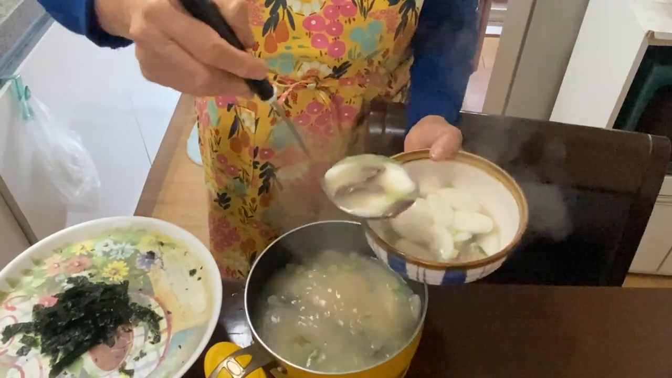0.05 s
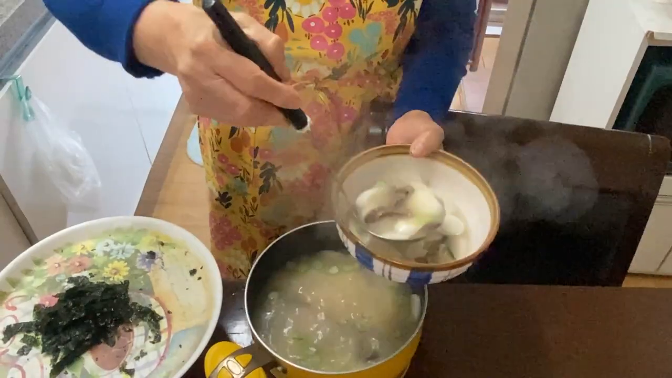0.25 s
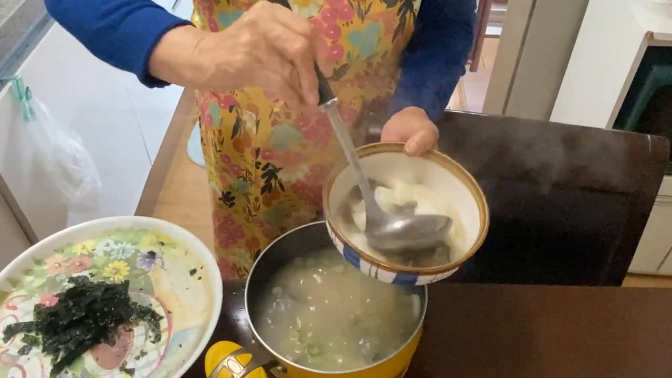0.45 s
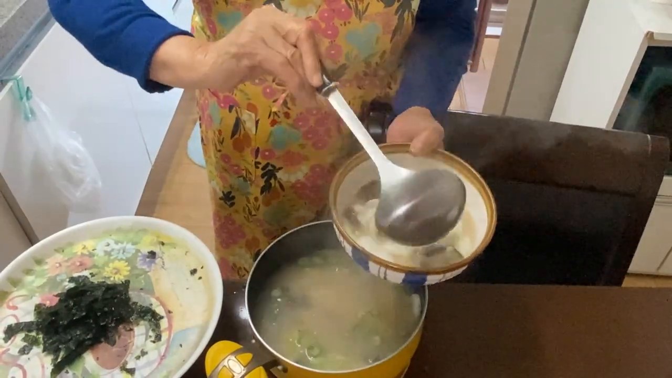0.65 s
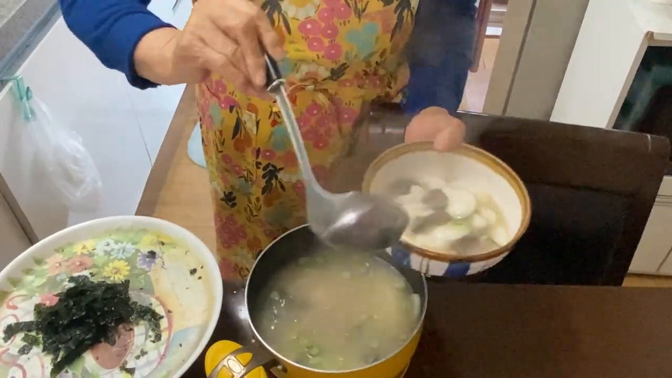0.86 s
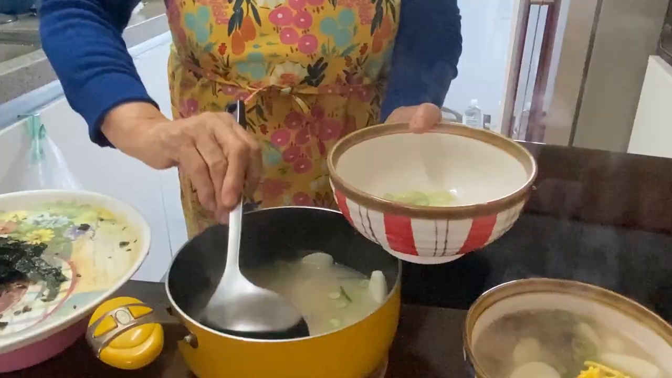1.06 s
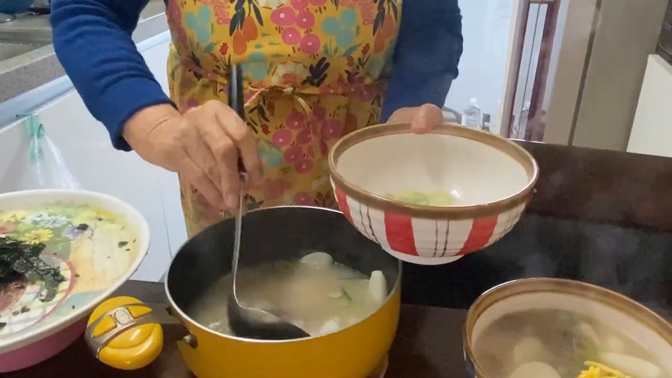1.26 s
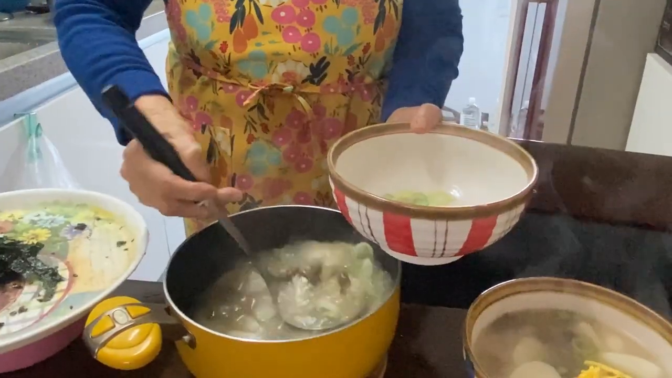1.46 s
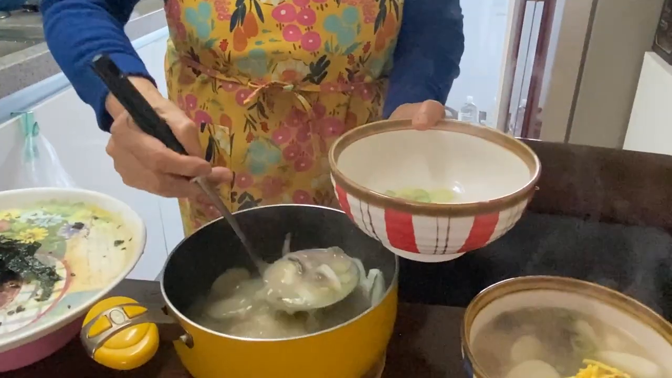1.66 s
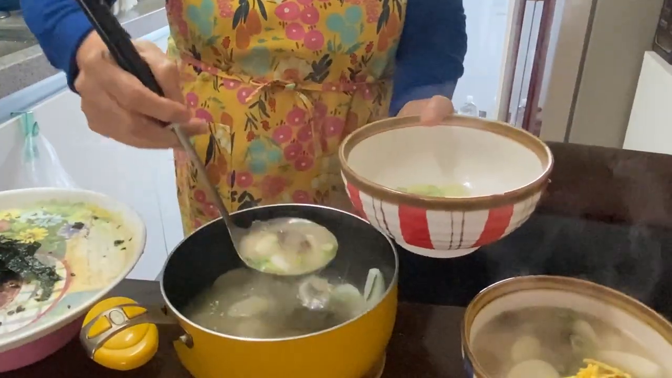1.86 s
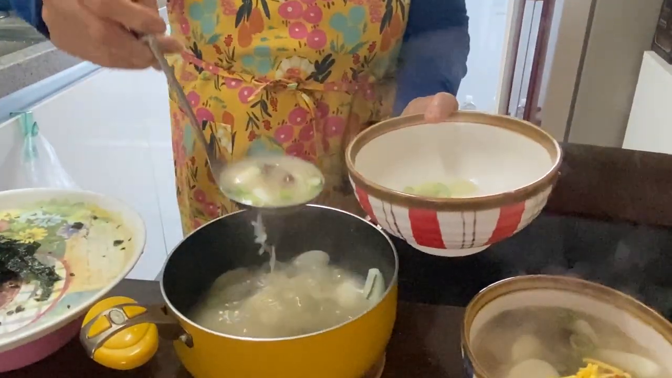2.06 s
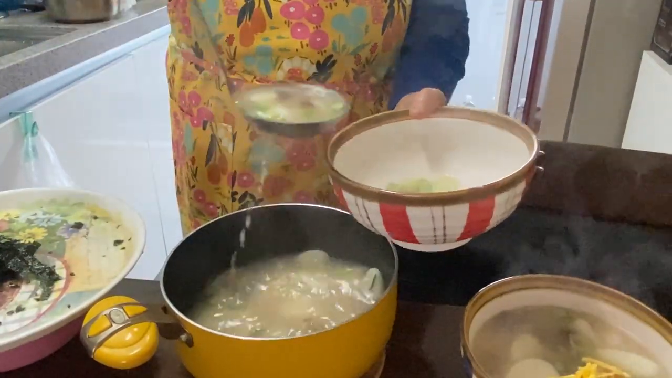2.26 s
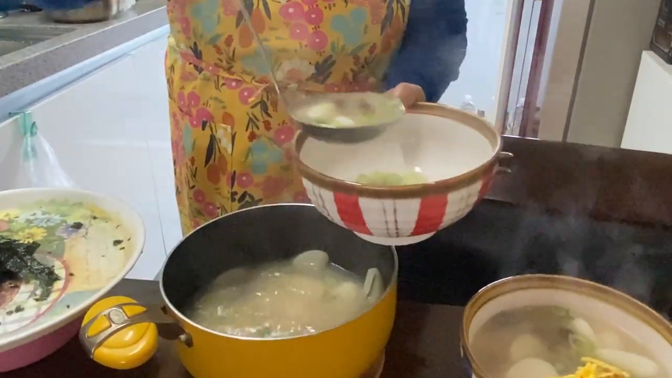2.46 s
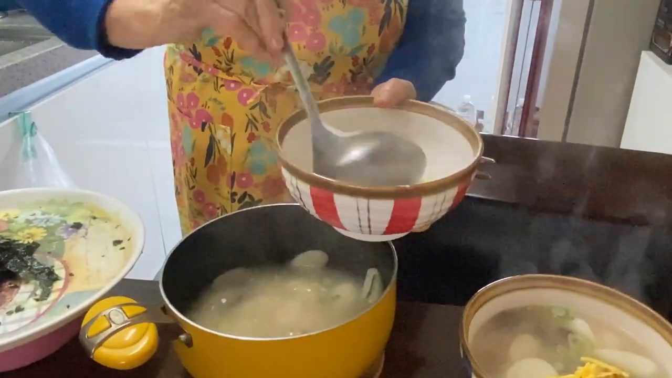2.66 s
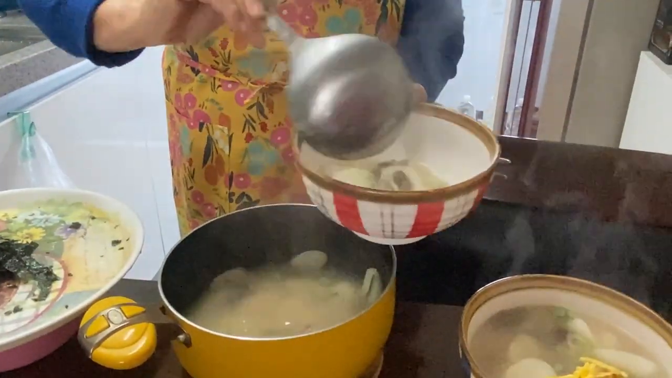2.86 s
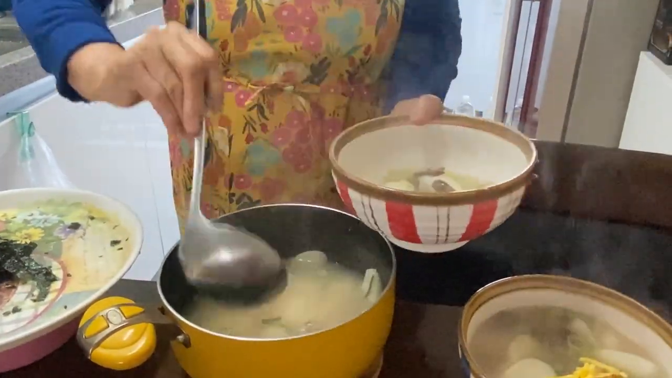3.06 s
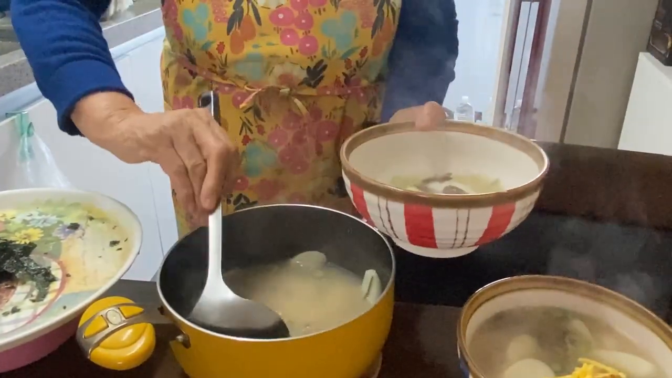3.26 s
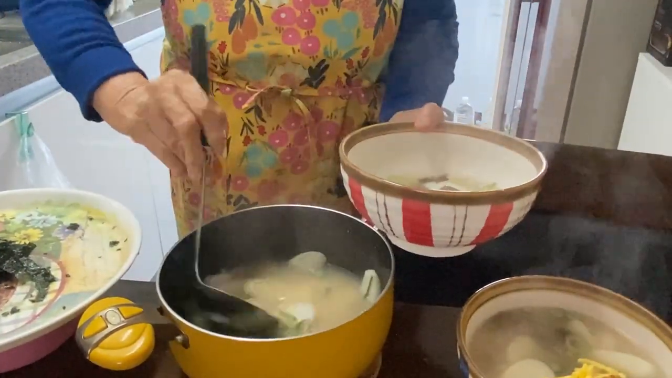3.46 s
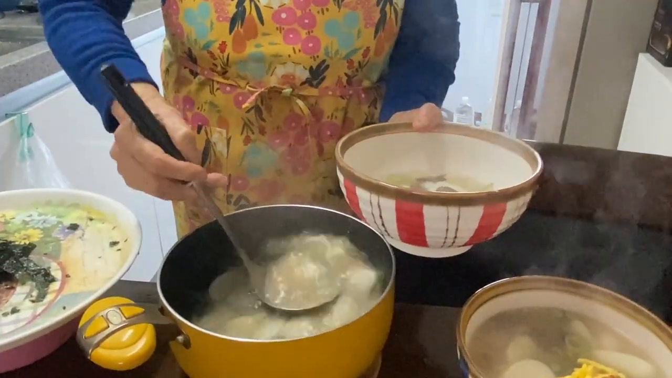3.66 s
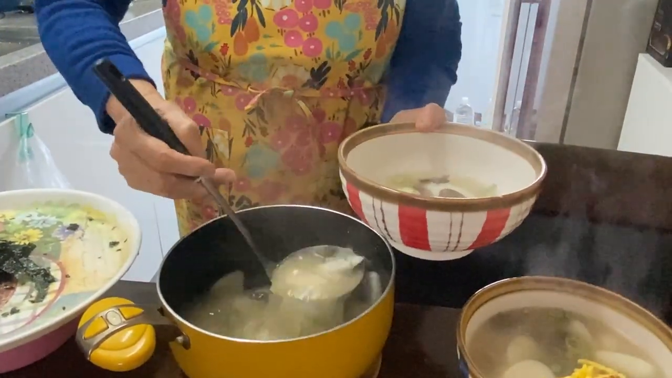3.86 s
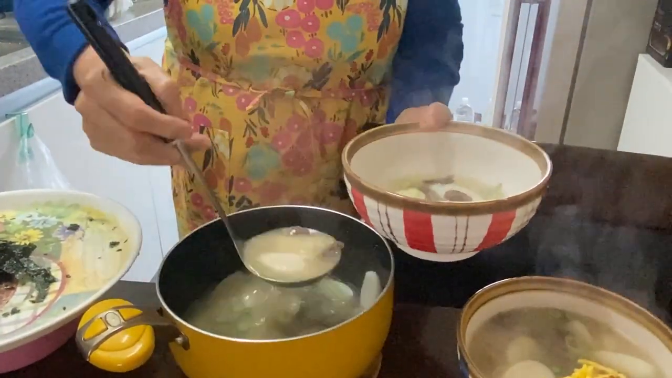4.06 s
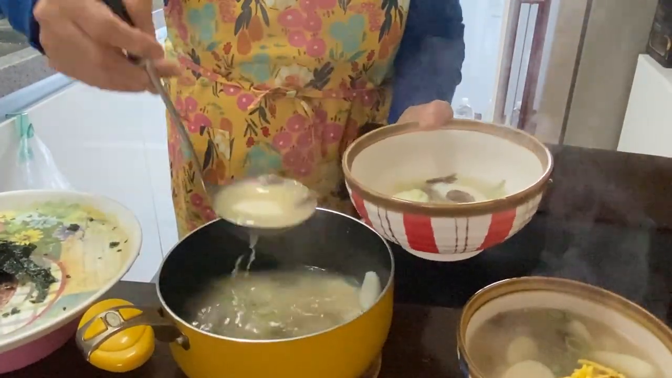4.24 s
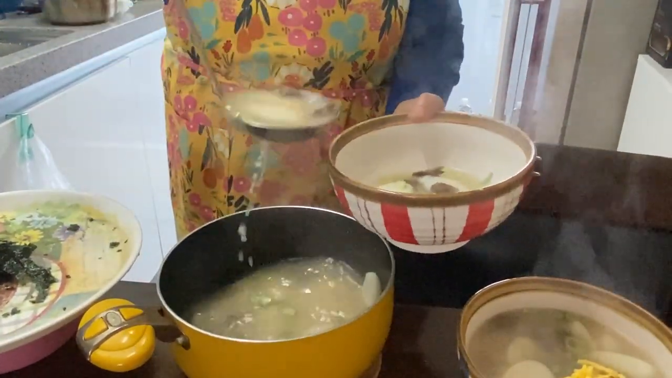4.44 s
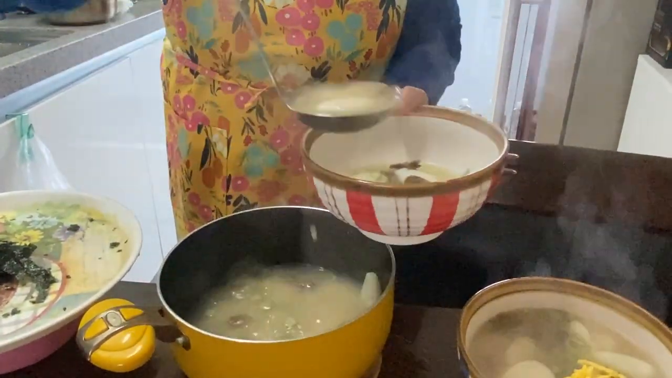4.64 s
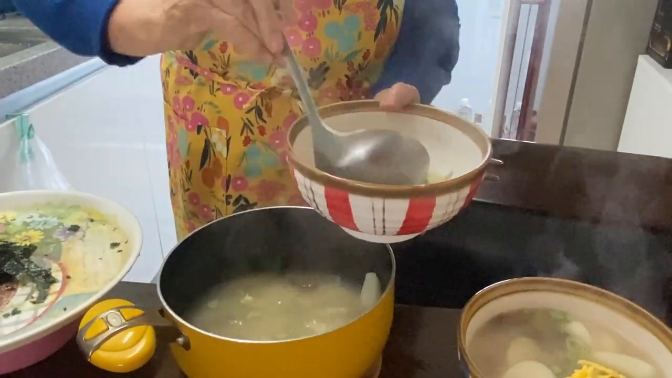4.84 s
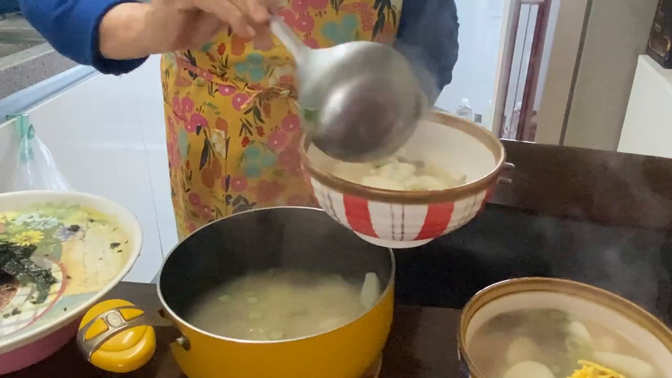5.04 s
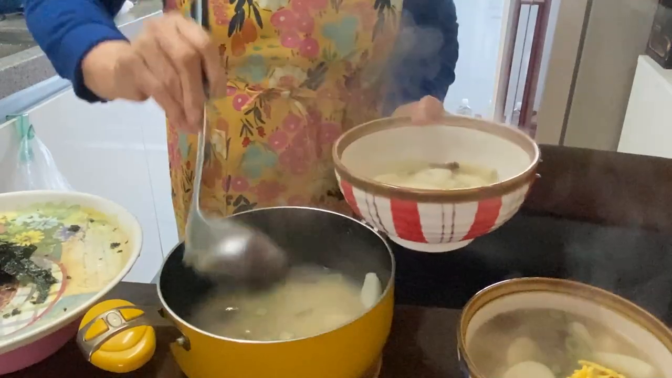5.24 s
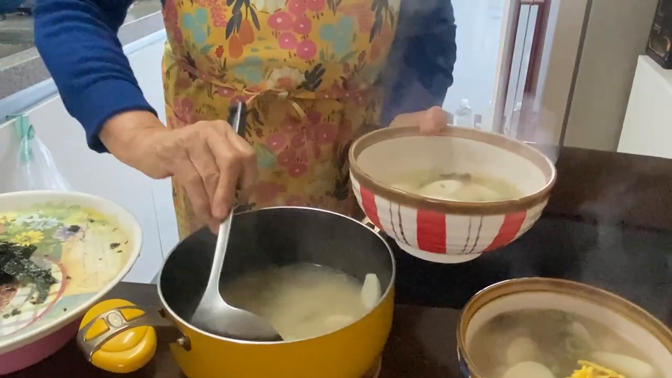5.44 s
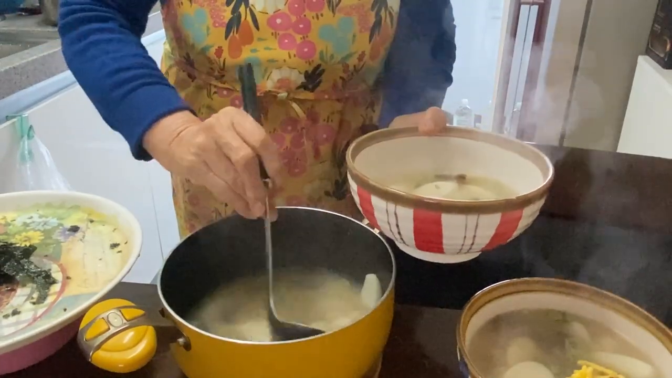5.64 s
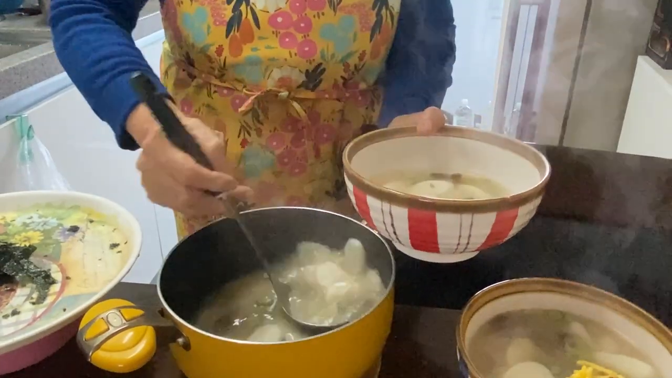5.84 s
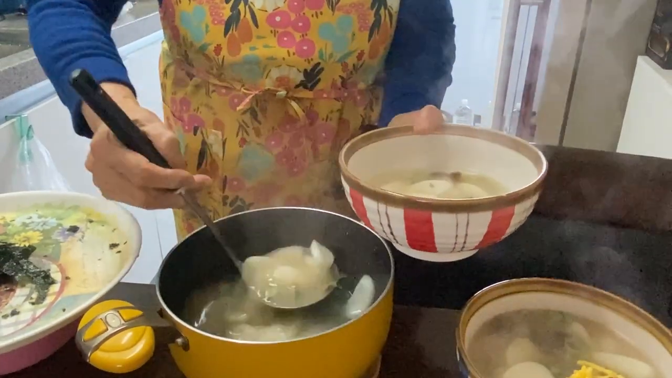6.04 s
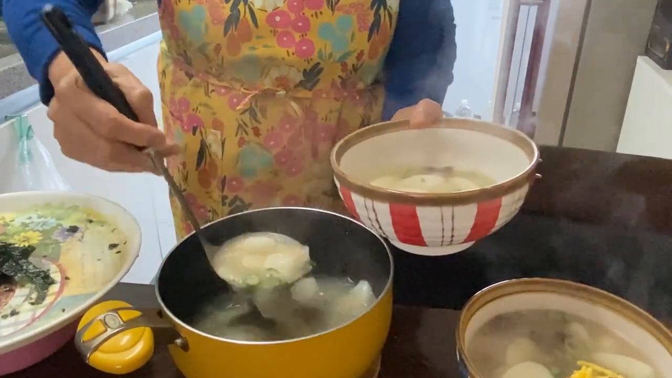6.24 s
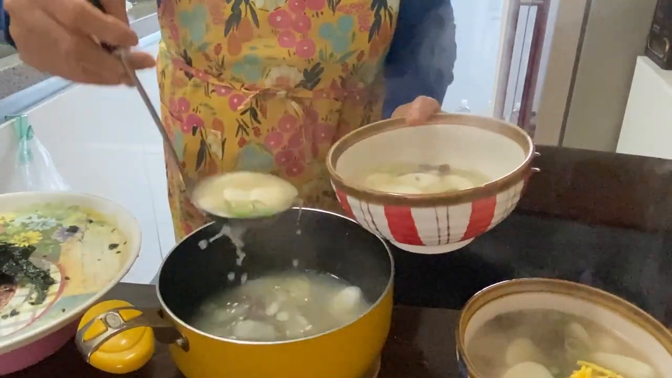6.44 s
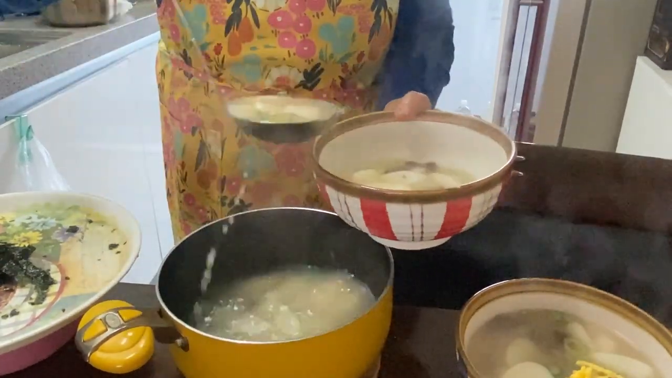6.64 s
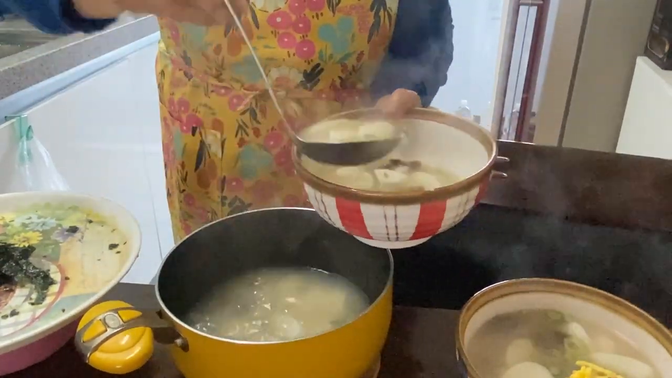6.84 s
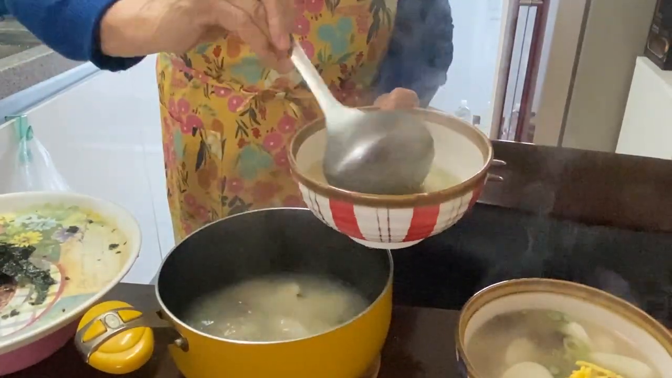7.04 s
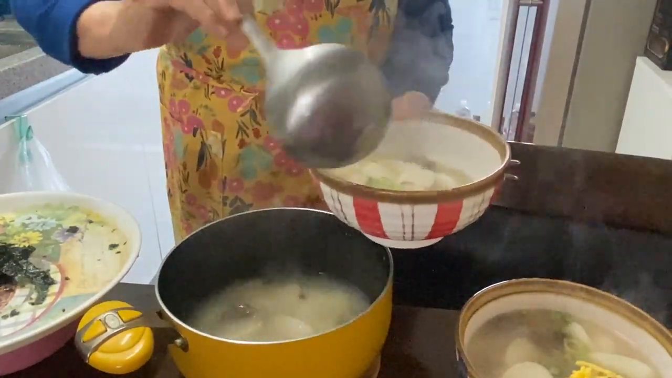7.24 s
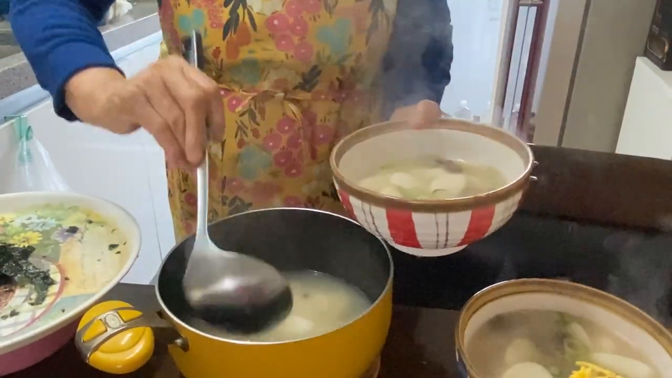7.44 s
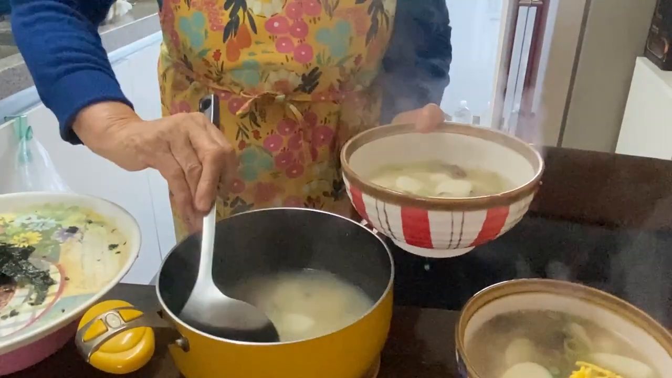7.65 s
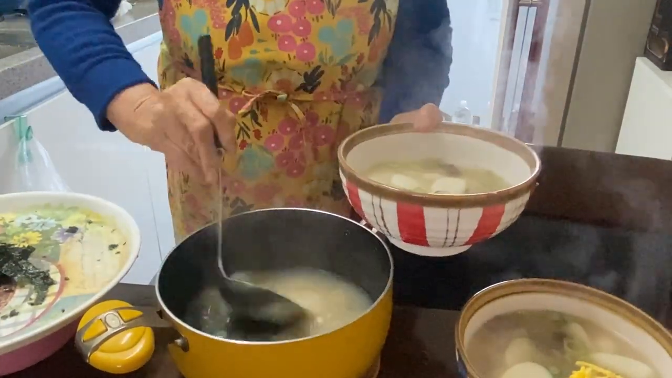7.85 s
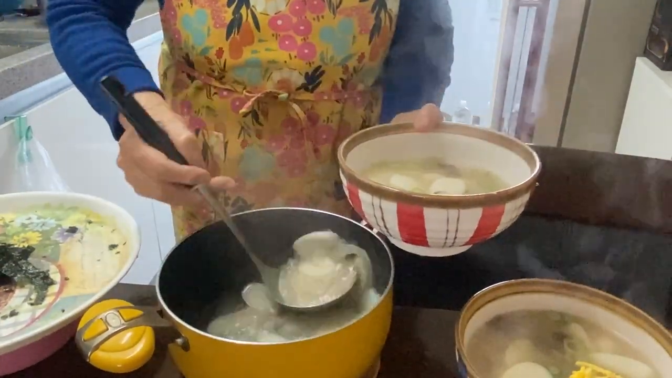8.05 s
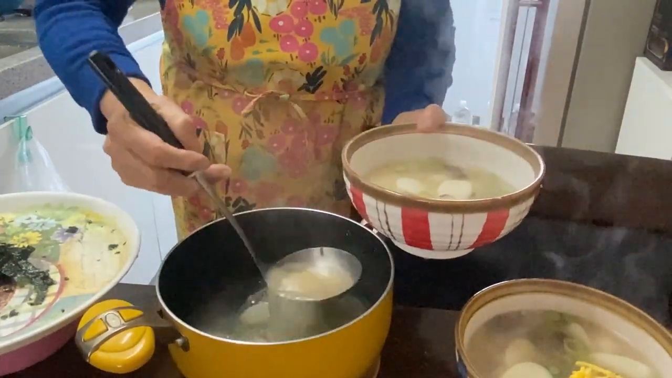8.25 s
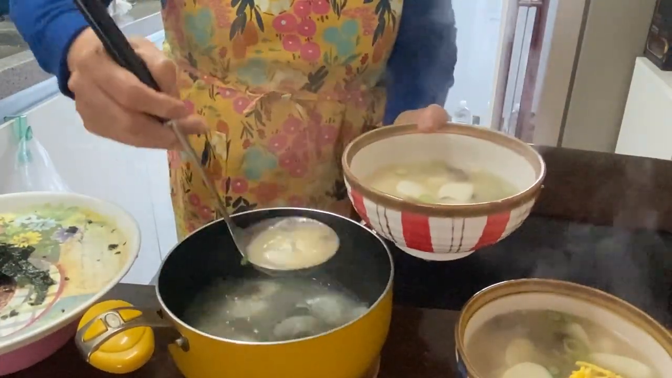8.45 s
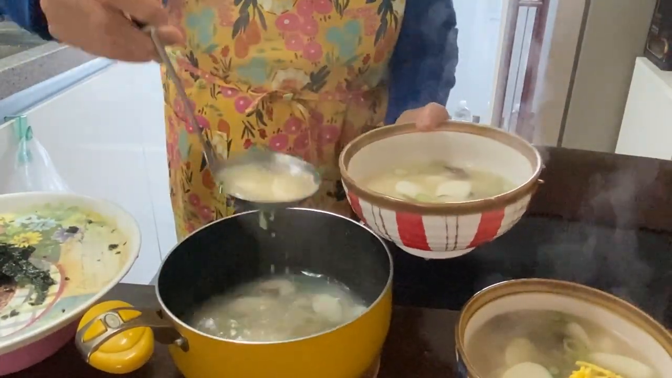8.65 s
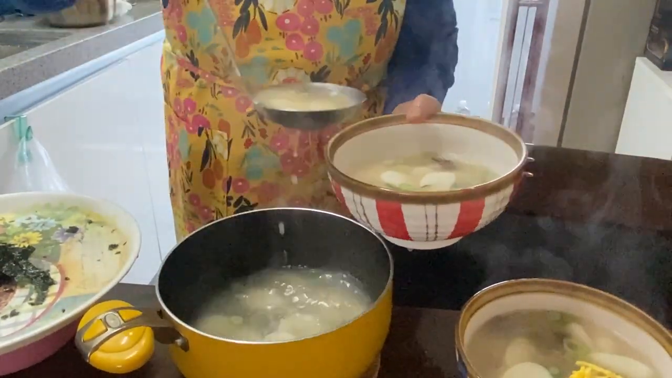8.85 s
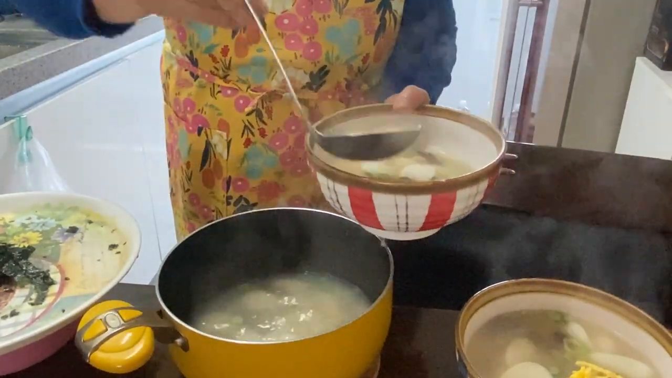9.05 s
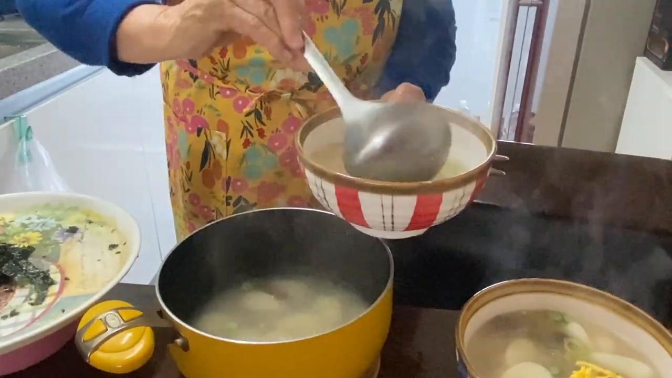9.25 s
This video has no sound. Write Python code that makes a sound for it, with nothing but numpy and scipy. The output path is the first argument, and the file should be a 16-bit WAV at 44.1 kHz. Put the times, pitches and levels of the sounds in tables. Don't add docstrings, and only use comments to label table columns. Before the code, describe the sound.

A metal ladle clanks and scrapes inside a soup pot four times, with sloshing, bright drips and small bubbling pours between dips in a kitchen.

```python
import sys
import numpy as np
from scipy import signal
from scipy.fft import rfft, irfft
from scipy.io import wavfile
from scipy.ndimage import uniform_filter1d

SR = 44100
rng = np.random.default_rng(int(sys.argv[2]) if len(sys.argv) > 2 else 0)


def inscribe(sig):
    pcm = np.round(np.clip(np.atleast_2d(sig).T, -1, 1) * 32767)
    wavfile.write(sys.argv[1], SR, pcm.astype(np.int16))


def attenuation_scalar(level_db):
    decades = np.asarray(level_db, float) / 20
    return 10 ** decades


N = 410130


def evened(x):
    return x / np.sqrt(np.mean(x ** 2) + 1e-20)


def read(points, hz):
    f, value = np.transpose(points)
    return np.interp(np.log(hz + 1), np.log(f + 1), value)


def coloured(x, points):
    gain = attenuation_scalar(read(points, np.fft.rfftfreq(len(x), 1 / SR)))
    return evened(irfft(rfft(x) * gain, len(x)))


def add(mix, s, sound):
    part = mix[round(s * SR):][:len(sound)]
    part += sound[:len(part)]


def humps(t, peaks_s, dbs, rise, fall):
    late = t - np.asarray(peaks_s)[:, None]
    drop_db = np.where(late < 0, -late * rise, late * fall)
    return np.sqrt((attenuation_scalar(np.asarray(dbs)[:, None] - drop_db) ** 2).sum(0))


def slow_humps(*shape):
    t = np.linspace(0, N / SR, num=4000)
    return np.interp(np.arange(N) / SR, t, humps(t, *shape))


def uneven(spread_db, hold):
    jumps = np.minimum(rng.exponential(1, N // hold + 1), 4)
    return rng.standard_normal(N) * attenuation_scalar(spread_db * jumps).repeat(hold)[:N]


def ring(t, dip, damping):
    # hz, t60_s, struck_db in dips 1, 2, 3, 4 and under the soup
    pot = [(700, 0.15, -25, -28.5, -25, -41.5, -20.5), (816, 0.12, -46, -24.5, -23, -43, -43),
           (913, 0.12, -26.5, -40.5, -30.5, -44, -24), (1002, 0.056, -44, -41, -17.5, -30.5, -53),
           (1150, 0.0857, -22, -38.5, -23.5, -32.5, -35), (1234, 0.4, -30.5, -37, -29, -34.5, -55),
           (1324, 0.15, -25, -31, -33.5, -33, -50), (1416, 0.1, -39, -23.5, -23.5, -33, -23),
           (1520, 0.11, -28, -38.5, -37, -49, -57), (2110, 0.25, -39.5, -37.5, -33, -55, -40),
           (2320, 0.12, -59, -33.5, -25, -30, -45), (2465, 0.22, -37, -30.5, -47, -46.5, -54),
           (2530, 0.14, -28, -49.5, -46.5, -55, -57), (2545, .35, -53, -45, -44, -54, -33),
           (2700, 0.12, -38, -29, -32, -36, -30), (2850, .14, -38, -46, -32, -51, -27),
           (3068, 0.14, -46, -29, -48, -34, -25.5)]
    # t60_s, struck_db in dips 1, 2, 3, 4 and under the soup
    ladle = [(0.093, -24.5, -16, -23, -31, -50), (0.085, -53, -34.5, -30, -39, -26),
             (0.29, -53, -17.5, -27, -30, -48), (.15, -31.5, -43.5, -58, -46, -50),
             (0.14, -42, -25, -42, -53.5, -55), (0.23, -41, -28.5, -35.5, -50.5, -44),
             (0.2, -37, -33, -31, -39.5, -57), (0.15, -36, -51, -47, -43, -54),
             (0.13, -62, -23.5, -50, -41, -58), (0.26, -44, -25, -42.5, -39, -44),
             (0.23, -47, -24.5, -38, -56, -55), (0.2, -50, -26.5, -37, -55.5, -56),
             (0.13, -36.5, -36.5, -37, -53.5, -51), (0.09, -39, -23, -21, -33, -33),
             (0.19, -69, -42.5, -60.5, -67.5, -67), (0.2, -68, -37.5, -58, -61.5, -48)]
    ladle_hz = [3190, 3530, 3684, 3742, 3835, 4095, 4582, 4645, 4960, 5530, 5612, 6597, 6920, 7605, 9400,
                10734]
    beat_depth, beat_low_hz, beat_top_hz = 0.7, 25, 90
    modes = pot + [(hz, *row) for hz, row in zip(ladle_hz, ladle)]
    hz, t60_s, *struck_db = np.transpose(modes)[:, :, None]
    fall_db = 60 * t / (t60_s * damping)
    level = attenuation_scalar(struck_db[dip]) * (attenuation_scalar(-1.3 * fall_db) + attenuation_scalar(-19 - 0.22 * fall_db))
    chance = rng.random(hz.shape)
    beat_hz = beat_low_hz + (beat_top_hz - beat_low_hz) * chance
    beat = 1 + beat_depth * np.sin(2 * np.pi * beat_hz * t)
    return (level * beat * np.sin(2 * np.pi * (hz * t + chance))).sum(0)


def clinks():
    # start_s, crack_peak_db, ring_db (re first blow of the dip), damping (factor on decay)
    blows = [(1.056, -23.5, -0.6, 0.42), (1.1288, -16.5, -36, 0.52), (3.195, -7.5, 0.5, 0.29),
             (3.229, -13, -23, 0.37), (5.3906, -9.5, 0.5, 0.41), (5.446, -28, -18.5, 0.3),
             (7.515, -15.5, 1.5, 0.41), (7.554, -27, -7, 0.29), (7.581, -26, -12, 0.36),
             (7.676, -53, -30, 0.72), (7.907, -26.5, -32, 0.55), (7.9248, -14.5, -3.5, 0.25)]
    dips = [
        2,
        4,
        6,
        7.85,
    ]
    # hz, db_per_hz
    crack_tone = [(120, -68.5), (200, -56), (500, -27.5), (735, -2.5), (1870, -9.5), (3760, -8),
                  (5630, -10.5), (7830, -14.5), (16000, -44)]
    out, t = np.zeros(N), np.arange(SR // 2) / SR
    for s, crack_db, ring_db, damping in blows:
        crack = coloured(rng.standard_normal(len(t)), crack_tone) * attenuation_scalar(crack_db - 8.0 - 60 * t / 0.033)
        tone = attenuation_scalar(ring_db) * ring(t, np.searchsorted(dips, s), damping)
        add(out, s, crack * np.minimum(t / 0.0005, 1) + tone * np.minimum(t / 0.0019, 1))
    return out


def handle():
    # hz, t60_s
    modes = [(3684, .36), (4582, .4), (5530, .38), (5612, .45), (6597, .33), (7605, .25)]
    # start_s, db of each mode
    blows = [
        (3.197, -41, -52, -40, -42, -46, -46.5),
        (5.392, -51, -53, -45.5, -55, -57, -57),
        (7.517, -50.5, -46.5, -50, -66, -58, -54),
    ]
    waver = 0.6
    out, t = np.zeros(N), np.arange(SR // 2) / SR
    hz, t60_s = np.transpose(modes)[:, :, None]
    for s, *dbs in blows:
        grip = uniform_filter1d(rng.standard_normal((len(hz), len(t))), size=500)
        flutter = 1 + waver * evened(grip)
        fade = attenuation_scalar(np.array(dbs)[:, None] - 60 * t / t60_s)
        add(out, s, (flutter * fade * np.sin(2 * np.pi * hz * t)).sum(0))
    return out


def bubble(turns, cycles, glide):
    fade = attenuation_scalar(-60 * turns / cycles) * np.minimum(turns / 2.1, 1) ** 2
    return fade * np.sin(2 * np.pi * (0.946 * turns + glide * turns ** 2 / cycles))


def gurgle(per_s, low_hz, top_hz, cycles, count=10):
    size = attenuation_scalar(1.8 * np.minimum(rng.exponential(1, N), 4)) * (rng.random(N) < per_s / SR)
    kind = rng.integers(0, count, N)
    shapes = [bubble(np.arange(2500) * hz / SR, cycles, 0.1) for hz in np.geomspace(low_hz, top_hz, count)]
    return sum(signal.oaconvolve(size * (kind == k), shape)[:N] for k, shape in enumerate(shapes))


def strokes():
    # peak_s, swell_s, rasp_db, slosh_db, thud_db
    pushes = [(0, .01, -58.5, -60, -72), (1.07, 0.0057, -45, -35.5, -42.5), (1.16, 0.072, -50, -45, -44.5),
              (1.248, 0.13, -42.5, -37.5, -69), (1.332, 0.14, -54, -43, -59.5),
              (1.42, 0.081, -59, -58, -60), (3.22, 0.0086, -32.5, -34.5, -42.5),
              (3.31, 0.037, -45, -61, -54), (3.475, 0.01, -55.5, -62, -56), (3.514, 0.082, -50.5, -44, -61),
              (5.413, 0.0051, -34, -35, -44.5), (5.499, 0.068, -61, -38, -47),
              (5.589, 0.12, -41.5, -43.5, -65), (5.659, 0.11, -49.5, -41.5, -59),
              (5.75, 0.065, -60, -68.5, -56.5), (7.532, 0.0064, -37.5, -35, -49),
              (7.71, 0.15, -69, -47.5, -50), (7.801, 0.2, -41, -44.5, -77), (7.89, 0.083, -51, -39, -65),
              (7.949, 0.067, -45, -36.5, -39), (8.058, 0.24, -51, -47, -76)]
    # hz, db_per_hz
    rasp_tone = [(880, -32), (1500, 3), (1870, 2.5), (3550, -1), (4000, -3.5), (5380, -4.5), (8500, -15),
                 (12500, -36), (16000, -45.5)]
    # hz, db_per_hz
    slosh_tone = [(210, -60.5), (350, -5.5), (530, -9), (658, -0.5), (901, -5), (1570, -13), (2200, -38.5),
                  (2860, -58.5), (4840, -120)]
    swell_db, falls_db_per_s = 22, [178, 136, 150]
    slips = uneven(2.0, 40)
    metal = evened(signal.oaconvolve(slips, ring(np.arange(6000) / SR, 3, 0.53))[:N])
    froth = evened(gurgle(910, 1050, 4200, 40))
    scraped = coloured(metal, [(1500, -38.0), (2000, 5.5), (4500, -6.0), (8000, -26.5)])
    rasp = evened(coloured(slips, rasp_tone) + 0.087 * scraped + 0.46 * froth)
    soup = coloured(rng.standard_normal(N), slosh_tone)
    lumps = evened(gurgle(600, 540, 1200, 37, count=14))
    slosh = evened(lumps + 0.8 * soup + 0.84 * coloured(metal, slosh_tone))
    thud = coloured(slips, [(70, -28.5), (110, 12.5), (230, 14), (400, 4.0), (520, -39.5)])
    s, swell_s, *levels_db = np.transpose(pushes)
    rise = swell_db / np.maximum(swell_s, 1e-3)[:, None]
    layers = zip([rasp, slosh, thud], levels_db, falls_db_per_s)
    return sum(x * slow_humps(s, dbs, rise, fall) for x, dbs, fall in layers)


def scrapes():
    # start_s, length_s, level_db,
    # from_hz, to_hz
    patches = [(1.172, 0.074, -50, 2000, 1920), (1.19, 0.043, -45.5, 1030, 1030),
               (1.207, 0.078, -50, 3360, 3190), (1.224, 0.054, -47, 2850, 2700),
               (1.219, 0.03, -42, 1326, 1420), (1.23, 0.04, -48, 1700, 1680),
               (1.236, 0.044, -44, 1100, 1180), (1.239, 0.049, -56, 710, 670), (1.3, 0.071, -44, 947, 791),
               (1.347, .05, -59, 700, 683), (3.463, 0.14, -46, 693, 692), (3.49, 0.046, -46, 945, 940),
               (3.494, 0.2, -59.5, 452, 330), (1.238, 0.035, -51.5, 5250, 5200),
               (5.454, 0.054, -43, 1460, 1440), (5.48, 0.034, -33, 907, 832),
               (5.547, 0.051, -50, 2400, 2370), (5.566, 0.049, -46, 2700, 2700),
               (5.57, 0.077, -47.5, 1700, 1520), (5.64, 0.046, -53, 1256, 1050),
               (7.698, 0.074, -45, 1255, 1417), (7.741, 0.11, -41, 686, 690), (7.747, 0.1, -43, 1120, 1108),
               (7.752, 0.069, -43.5, 2900, 2750), (7.737, 0.089, -46, 3590, 3780),
               (7.77, 0.061, -43.5, 3300, 3200), (7.79, 0.051, -45, 2330, 2290),
               (7.818, 0.069, -49.5, 2470, 2480), (7.79, .04, -46, 1540, 1550),
               (7.791, 0.043, -48.5, 2064, 1920), (7.935, 0.048, -36.5, 700, 668),
               (8.026, 0.04, -49, 1880, 1890), (8.02, 0.044, -48, 900, 880), (4.835, .1, -51, 947, 940)]
    width_hz, widens = 70, 0.04
    out = np.zeros(N)
    for s, length_s, db, from_hz, to_hz in patches:
        a, b = rng.standard_normal((2, 9000))
        r = np.exp(-np.pi * (width_hz + widens * from_hz) / SR)
        u = np.minimum(np.arange(9000) / (length_s * SR), 1)
        turn = np.exp(2j * np.pi * np.cumsum(from_hz + (to_hz - from_hz) * u) / SR)
        once = signal.lfilter([1], [1, -r], a + 1j * b)
        tone = (turn * signal.lfilter([1], [1, -r], once)).real
        add(out, s, attenuation_scalar(db) * evened(tone) * np.sin(np.pi * u) ** 0.49)
    return out


def fizz():
    # peak_s, level_db
    bursts = [(1.25, -59), (3.235, -56), (3.5, -57.5), (5.59, -57), (6.99, -55.5), (7.72, -62), (7.77, -58),
              (7.815, -69), (7.897, -54), (8.056, -72), (4.835, -53), (2.638, -58.5)]
    # hz, db_per_hz
    tone = [(4000, -29.5), (6000, 0), (8000, -0.5), (10000, -12.5), (13000, -13.5), (16000, -29)]
    rise_db_per_s, fall_db_per_s = 500, 290
    envelope = slow_humps(*np.transpose(bursts), rise_db_per_s, fall_db_per_s)
    return coloured(uneven(3.5, 30), tone) * envelope


def drops(rows, cycles, glide, splat_s):
    out, t = np.zeros(N), np.arange(2000) / SR
    for s, db, hz, *splat_db in rows:
        tone = [(hz / 2, -45), (hz * 0.73, 0), (hz * 1.65, -7), (hz * 2.9, -31), (40000, -50)]
        hiss = coloured(rng.standard_normal(2000), tone)
        fade = attenuation_scalar((splat_db or [-9])[0] - 60 * t / splat_s)
        splat = fade * np.minimum(t * hz / 1.34, 1) * hiss
        add(out, s, attenuation_scalar(db) * (bubble(t * hz, cycles, glide) + splat))
    return out


def spattered(rows, count=2):
    within_s, below_db, higher = 0.018, -11, 0.58
    chance = rng.random((len(rows), count, 3))
    return rows + [(s + within_s * (0.12 + late), db + below_db - 6 * weak, hz * (1 + higher * up), -6)
                   for (s, db, hz, *_), kids in zip(rows, chance) for late, weak, up in kids]


def pops():
    # start_s, peak_db
    bursts = [(0.0464, -55), (0.7931, -60), (0.576, -69), (6.966, -60), (1.9054, -51), (2.048, -54),
              (2.252, -55), (3.756, -64), (3.8463, -52.5), (3.915, -52.5), (4.1287, -62), (4.711, -60),
              (4.7773, -54), (4.8218, -29.5), (5.0474, -58.5), (5.2034, -58), (5.3023, -57), (5.6587, -47),
              (5.7806, -51.5), (6.418, -58), (6.449, -59), (6.725, -50.5), (8.113, -59), (8.3254, -52),
              (9.1276, -59)]
    out, t = np.zeros(N), np.arange(256) / SR
    faint = [(s * N / SR, -72 + 8 * u) for s, u in rng.random((70, 2))]
    tone = [(5000, -33.0), (8000, -1.5), (10500, -9.0), (14000, -15.5), (20000, -48.0)]
    for s, db in bursts + faint:
        hiss = coloured(rng.standard_normal(256), tone)
        add(out, s, attenuation_scalar(db + 8.0 - 60 * t / 0.0051) * np.minimum(t / 0.00044, 1) * hiss)
    return out


def drips():
    # start_s, peak_db, pitch_hz
    small = [(0.0578, -37.5, 5430), (0.3975, -37, 5550), (0.402, -28, 4900), (1.39, -36.5, 6800),
             (1.899, -27, 7250), (1.9369, -36, 6000), (1.9648, -33.5, 5600), (1.9987, -35, 5470),
             (2.0471, -33.5, 6740), (2.1075, -32.5, 5930), (1.8678, -44, 4900), (1.9795, -52, 6000),
             (2.062, -38, 5800), (2.12, -39, 6100), (2.1262, -45, 5500), (6.8967, -58, 5300),
             (6.918, -43.5, 5400), (6.926, -44.5, 5700), (6.9815, -40, 6200), (6.994, -43, 5600),
             (5.657, -29.5, 7130), (5.722, -40, 6100), (2.2781, -34, 6600), (2.2961, -40, 6800),
             (2.5959, -32, 6400), (2.6183, -31, 5960), (2.6298, -27.5, 6150), (4.1415, -39.5, 7350),
             (4.339, -35, 5630), (4.6004, -43, 5400), (4.8065, -49, 5650), (4.8222, -14, 6530),
             (5.7797, -40, 5500), (6.4961, -35.5, 7550), (6.6109, -28, 5730), (6.7271, -37.5, 6320),
             (6.9481, -44, 5930), (6.973, -27, 6500), (7.0838, -33, 5930), (8.1622, -36, 6900),
             (8.1831, -40, 5700), (9.1435, -39.5, 5600)]
    # start_s, peak_db, pitch_hz, splat_db (re bubble)
    middle = [(1.3109, -33, 3070, -17), (1.772, -42, 3260, -20), (1.8966, -35, 3150, -25),
              (1.916, -36.5, 3750, -20), (1.9674, -48, 2210, 9), (2.1775, -40, 2700, -27),
              (2.182, -35, 3300, -26), (2.234, -48, 4440, -18), (0.372, -51, 2900, 3),
              (0.647, -52.5, 2420, 0), (0.654, -47, 3000, -7), (1.366, -47, 3320, -2),
              (1.385, -41.5, 3360, -4), (1.422, -44.5, 3400, -4), (1.461, -50, 1910, 2),
              (8.055, -37, 4330, -7.5), (6.994, -33.5, 4160, -10), (6.929, -56, 3700, -15),
              (2.2744, -46, 1550, 11), (2.6294, -35.5, 3120, 2), (3.718, -36.5, 3280, -30),
              (3.7827, -40, 2800, -16), (3.8185, -40, 3260, -4.5), (4.3084, -37, 1900, -8.5),
              (4.4249, -43, 3670, -7), (4.6379, -42, 2800, -8), (4.6985, -43, 2970, -13),
              (4.8072, -42, 3680, 3), (4.8183, -42, 4280, 0), (6.3045, -46, 1710, -1),
              (6.355, -39.5, 3390, -13), (6.4368, -43.5, 4560, -17), (6.5094, -34.5, 4080, -11),
              (6.6767, -40, 3300, -8), (6.912, -31.5, 3080, -13), (6.976, -30.5, 2630, -19),
              (6.9823, -26.5, 3060, -9), (8.165, -43.5, 1450, 3.5), (8.312, -33, 3200, -11),
              (8.496, -44, 2110, -2), (9.1446, -44.5, 2650, -4), (9.183, -35, 2000, -9.5)]
    # start_s, peak_db, pitch_hz, splat_db (re bubble)
    large = [(0.344, -26.5, 926, -16.5), (0.371, -49, 1100, 5.5), (1.642, -33.5, 1110, -39),
             (2.402, -39.5, 750, -32), (2.593, -52, 1110, 3), (2.612, -46, 900, -1),
             (2.621, -28.5, 956, -16), (2.63, -20, 1008, -14.5), (3.462, -41.5, 593, 3.5),
             (3.846, -41, 1200, -3.5), (6.973, -44, 1110, 0.5), (7.084, -40.5, 1045, -2.5),
             (7.6745, -31, 620, -17), (7.676, -32.5, 1040, -11), (8.316, -53.5, 1070, 8.5),
             (9.152, -39, 974, -6.5), (4.8205, -19.5, 1060, -12), (4.826, -20.5, 810, -15)]
    spray_s = [.031, 0.153, .196, 0.317, 0.3407, 0.5, 1.3103, 1.42, 1.489, 1.7413, 2.252, 2.807, 3.717,
               3.916, 4.778, 5.039, 5.1613, 5.9537, 6.0453, 6.1464, 6.2143, 8.238, 9.129, 9.197]
    # start_s, pitch_hz
    faint_middle_rows = [(.4948, 2480), (1.6681, 3300), (2.5713, 3300), (2.892, 3200), (3.6326, 4000),
                         (3.5483, 2380), (3.942, 3320), (5.883, 2780), (5.995, 2086), (6.6315, 1680),
                         (7.083, 2250), (8.067, 2850), (8.2357, 3000), (8.75, 3350), (8.8399, 1650)]
    spray_db, spray_low_hz, spray_top_hz, faint_middle_db = -45, 4900, 6800, -46.5
    spray = [(s, spray_db, rng.uniform(spray_low_hz, spray_top_hz)) for s in spray_s]
    faint_middle = [(s, faint_middle_db, hz) for s, hz in faint_middle_rows]
    fine = drops(spattered(small, count=1) + spray, 32, 0.14, 0.0054)
    plain = drops(spattered(middle) + faint_middle, 35.0, 0.24, 0.019)
    return fine + plain + drops(large, 21.5, 0.1, 0.06) + pops()


def dribbles():
    # start_s, peak_db, pitch_hz
    rows = [(1.372, -47, 10000), (1.949, -46, 2520), (1.967, -50, 990), (1.98, -46, 1010),
            (3.737, -54, 1800), (3.797, -50, 1250), (3.888, -47, 3100), (3.907, -48, 1580),
            (3.936, -49, 1740), (4.974, -53, 5800), (4.989, -48.5, 3030), (6.272, -50, 5000),
            (2.717, -47, 9200), (6.36, -46, 3300), (6.418, -54, 2010)]
    return drops(rows, 41.0, 0.086, 0.027)


def kitchen(x):
    # hz, t60_s
    room = [(400, 0.45), (1060, 0.24), (2790, 0.4), (7350, 0.16)]
    taps, at = np.zeros((3, SR // 2)), np.arange(120, SR // 2 - 20, 20)
    signs = rng.choice([-1., 1.], (3, len(at)))
    np.put_along_axis(taps, at + rng.integers(0, 20, (3, len(at))), signs, 1)
    hz, t, z = signal.stft(taps, SR, nperseg=256)
    tails = signal.istft(z * attenuation_scalar(-60 * t / read(room, hz)[:, None]), SR, nperseg=256)[1]
    phase = np.arange(N) * 2.3 / SR + np.arange(3)[:, None] / 3
    turns = np.cos(2 * np.pi * phase) * np.sqrt(2 / 3)
    return signal.oaconvolve(x * turns, tails / np.linalg.norm(tails[0]), axes=1)[:, :N].sum(0)


def fuzz(hz, width_hz):
    r, turn = np.exp(-np.pi * width_hz / SR), np.exp(2j * np.pi * hz * np.arange(N) / SR)
    z = rng.standard_normal(N) + 1j * rng.standard_normal(N)
    return evened((turn * signal.lfilter([1 - r], [1, -r], z)).real)


def air():
    # hz, db_per_hz
    tone = [(53, -31), (90, -12.5), (119, -6), (310, -16), (353, -12.5), (721, -13.5), (977, -8),
            (1140, -12), (1790, -20.5), (5300, -24.5), (7330, -27), (8910, -38), (12300, -40.5),
            (16000, -60)]
    # pitch_hz, width_hz, level_db, start_s, end_s
    hum = [(172, 8.1, -69.5, 4, 4.77), (111, 2.4, -67, 5.8, 6.4), (175, 12, -62, 3.62, 3.92),
           (330, 150, -69.5, 6.0, 6.35), (171, 8, -70.5, 6.1, 6.55)]
    air_db = -64
    frames, hz = N // 256 + 5, np.fft.rfftfreq(1024, 1 / SR)
    a, b, patches = rng.standard_normal((frames, 513, 3)).T
    patches = evened(uniform_filter1d(uniform_filter1d(patches, 14, 0), 20, 1))
    z = (a + 1j * b) * attenuation_scalar(read(tone, hz)[:, None] + 1.5 * patches)
    out = attenuation_scalar(air_db + 1.5) * evened(signal.istft(z, nperseg=1024, noverlap=768)[1][:N])
    t = np.arange(N) / SR
    for pitch_hz, width_hz, db, start, end in hum:
        fade = np.clip(np.minimum(t - start, end - t) / 0.17, 0, 1)
        out = out + attenuation_scalar(db) * fuzz(pitch_hz, width_hz) * fade
    return out


def rumble():
    # time_s, level_db
    sway_db = [(0, -36), (.8, -44.5), (.93, -27), (1.14, -40.5), (1.55, -31), (1.66, -37.5), (9.3, -40)]
    # peak_s, level_db
    jolt_rows = [
        (.92, -36.5),
        (1.16, -37),
        (3.25, -34),
        (5.45, -37),
        (7.56, -41.5),
        (7.72, -37),
        (7.98, -38),
    ]
    # end_s, jump_db, rise_s
    cuts = [
        (1.0040, -22, 0.024),
        (8.879, -42.5, 0.02),
    ]
    calm_db, rise_db_per_s, fall_db_per_s = -56.5, 260, 122
    t = np.arange(N) / SR
    sway_tone = [(1, -21.5), (4, 9.5), (12, -0.5), (28, -9.5), (45, -54.5), (200, -97.5)]
    buffet_tone = [(18, -34.0), (30, -3.5), (58, 1.0), (90, -17.0), (140, -53.5), (400, -91.0)]
    sway = coloured(rng.standard_normal(N), sway_tone)
    buffet = coloured(rng.standard_normal(N), buffet_tone)
    jolts = attenuation_scalar(calm_db) + humps(t, *np.transpose(jolt_rows), rise_db_per_s, fall_db_per_s)
    swings = attenuation_scalar(np.interp(t, *np.transpose(sway_db))) * sway + jolts * buffet
    swells = sum(attenuation_scalar(db) * np.exp(np.minimum(t - at, 0) / rise) * (t < at) for at, db, rise in cuts)
    dip = np.minimum(abs(t - cuts[0][0]) / 0.033, 1)
    return swings * dip + uniform_filter1d(swells, size=2)


def scene():
    metal = clinks() + handle()
    water = drips()
    wet = kitchen(attenuation_scalar(-8) * water + attenuation_scalar(-8.5) * metal)
    ladle_work = strokes() + scrapes() + fizz()
    return (metal + water + wet + ladle_work + dribbles() + air() + rumble())[None]


def low_pass(x):
    return signal.sosfilt(signal.butter(12, 16560, fs=SR, output="sos"), x)


def record(dry):
    edge = signal.firwin(numtaps=101, cutoff=15900, fs=SR)
    return low_pass(signal.oaconvolve(dry, edge[None], "same"))


dry = scene()
out = record(dry)
inscribe(out)
```